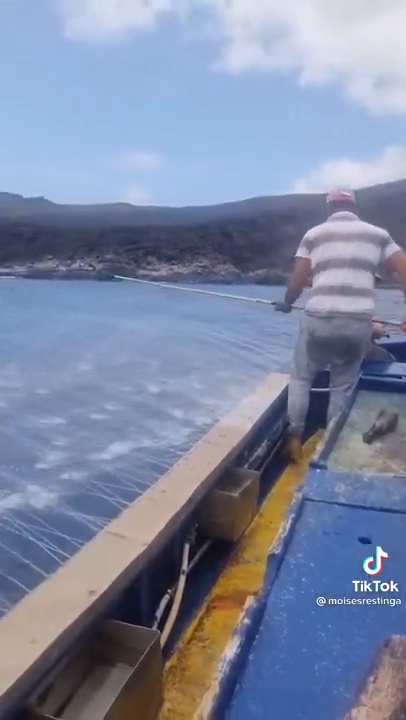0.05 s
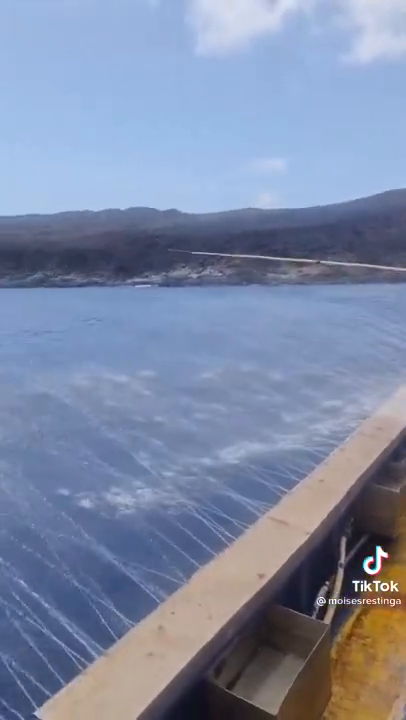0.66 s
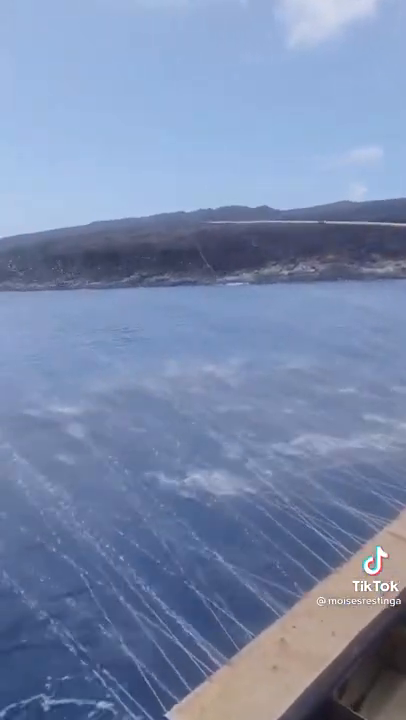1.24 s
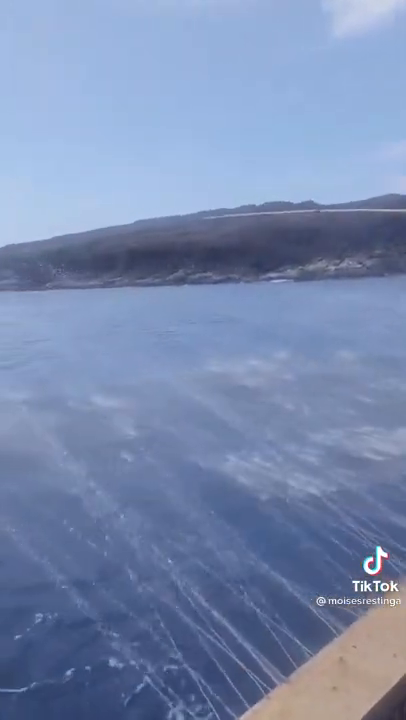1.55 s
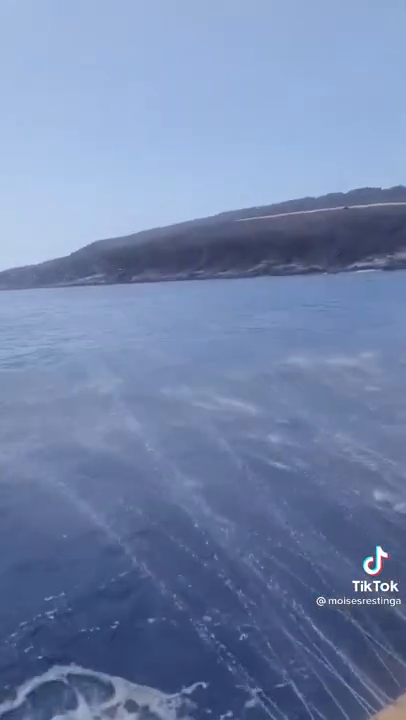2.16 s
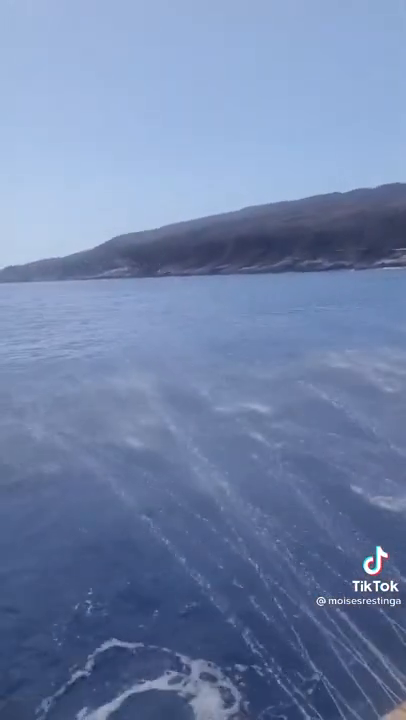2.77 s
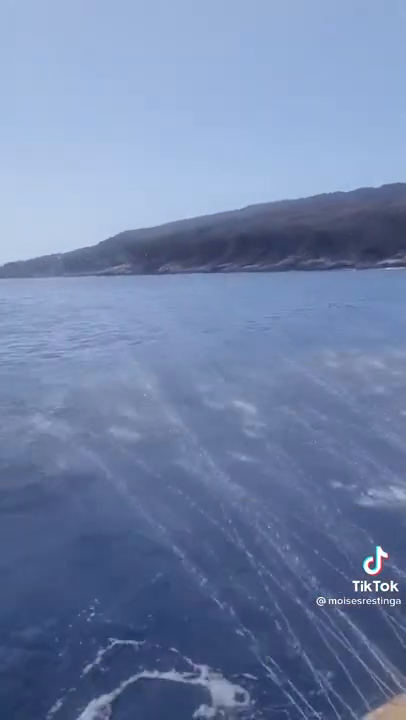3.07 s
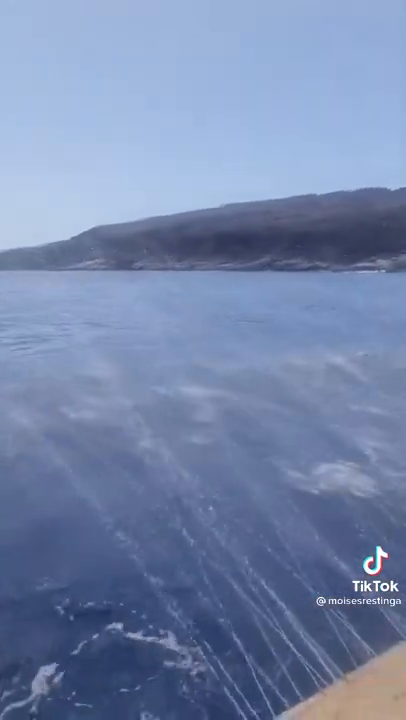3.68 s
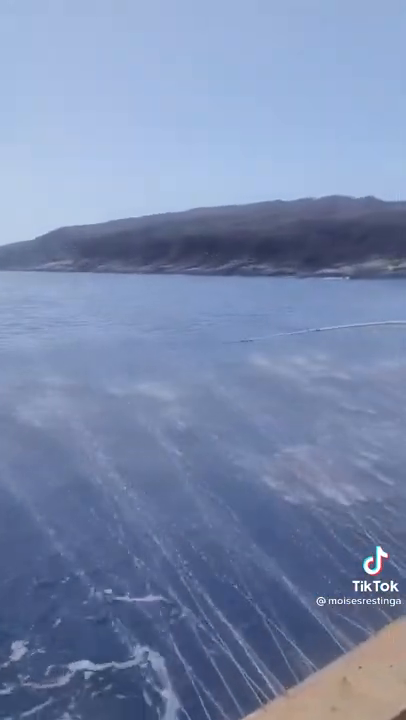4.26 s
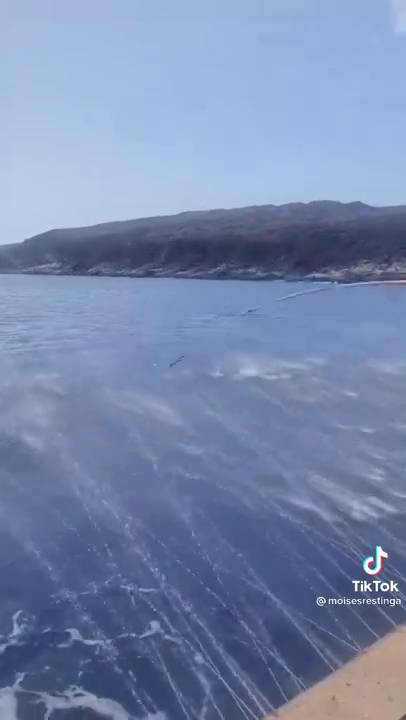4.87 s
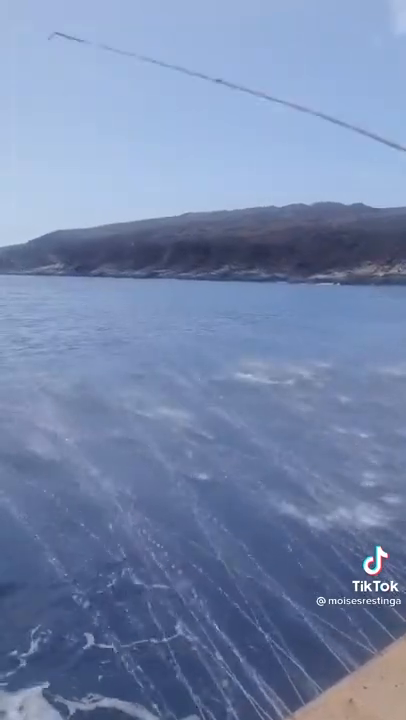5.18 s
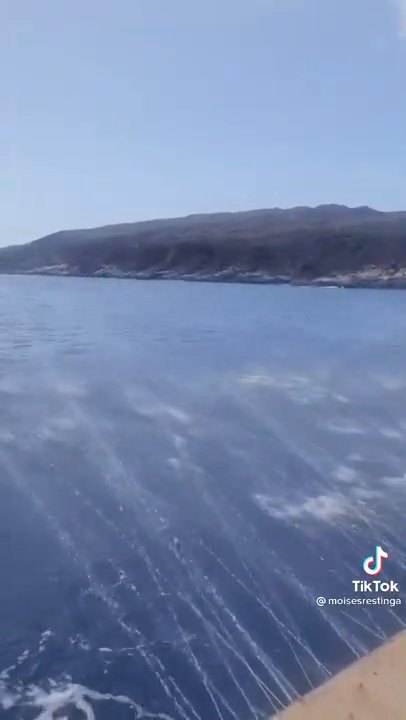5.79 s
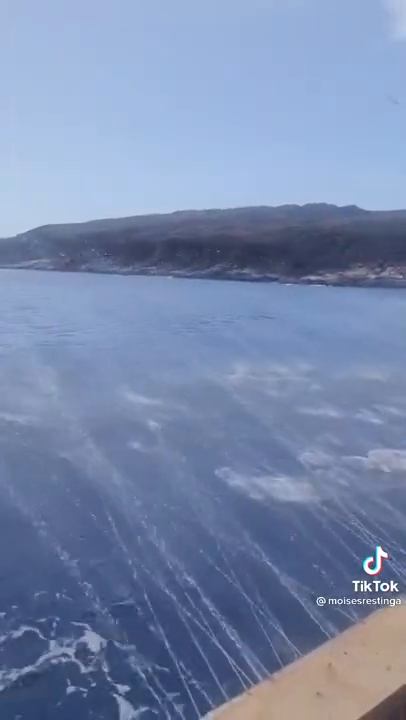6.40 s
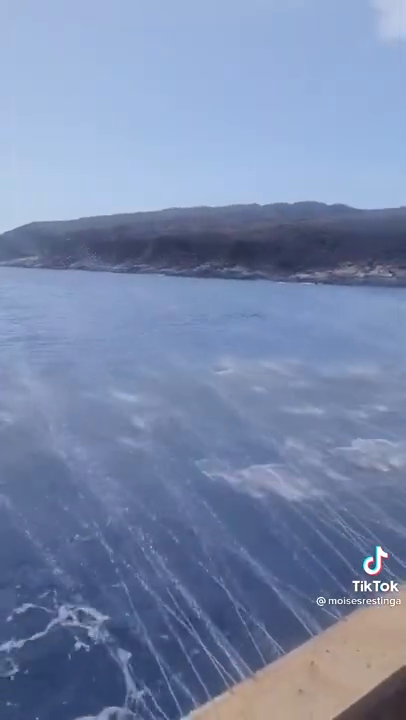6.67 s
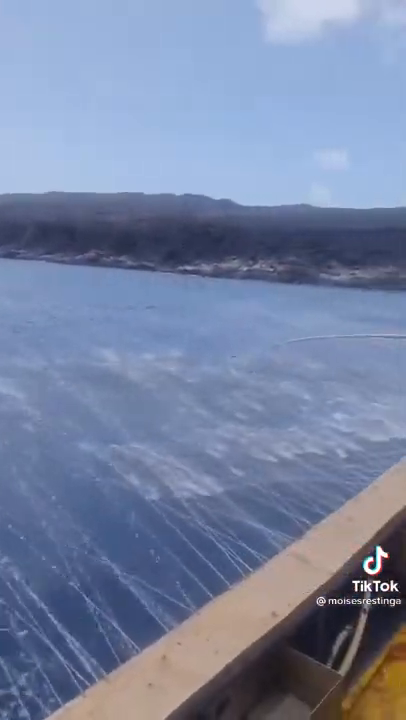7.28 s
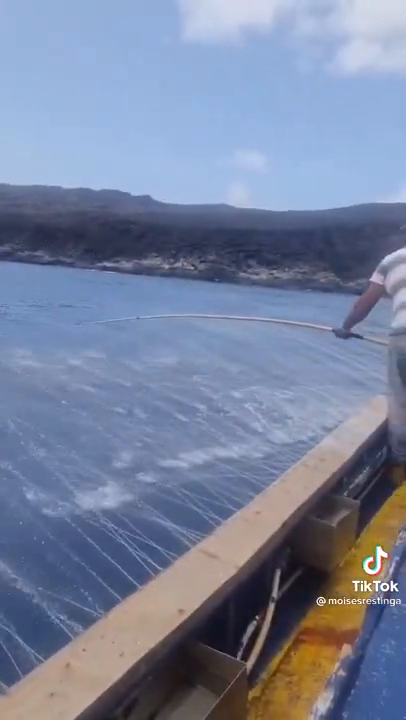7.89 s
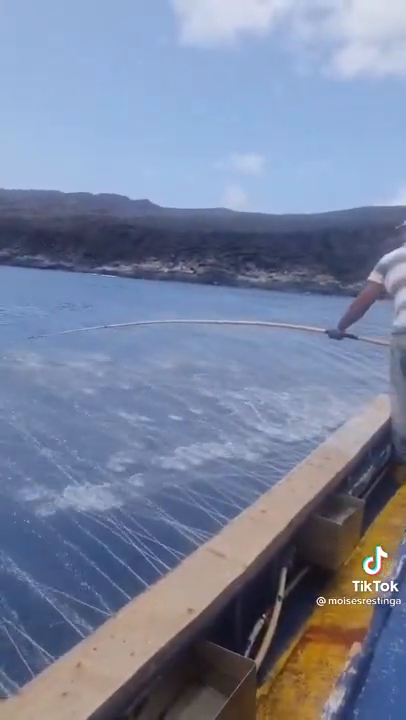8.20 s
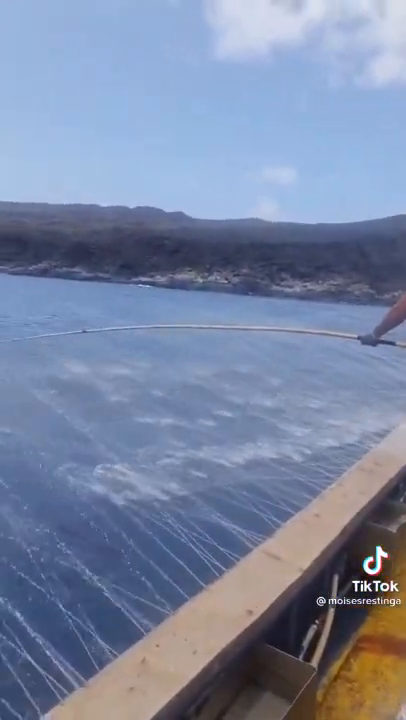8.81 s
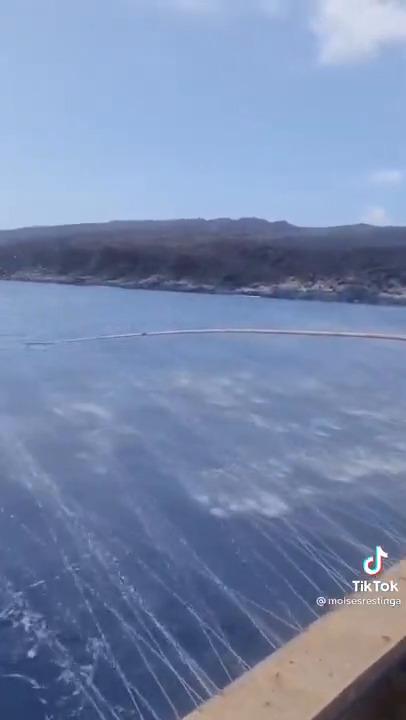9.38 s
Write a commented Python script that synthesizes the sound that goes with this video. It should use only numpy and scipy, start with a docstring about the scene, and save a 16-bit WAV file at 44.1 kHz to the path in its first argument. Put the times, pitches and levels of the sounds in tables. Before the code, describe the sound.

A steady, wide hiss of water jets splashing onto the sea runs over the low pulsing hum of a small boat's engines, heard from on deck. Early on, short wooden knocks and slaps of water come irregularly close by, and a few large drops tick. The knocks thin out in the middle, then come back as a louder cluster in the last two seconds while the spray and drone carry on.

```python
"""On the deck of a small fishing boat. From the start, main and pump engine drone 1.7 Hz apart,
so their hum throbs slowly; the swell sways both speeds, the pump surges and the planks rumble.
Throughout, a row of jets along the rail rains onto the sea in a fine hiss of drops and bubbles.
In the first 4 s, things thump on the wooden deck and water slaps down close by.
Single large drops tick between 1.5 and 7 s; from about 8 s the thumps come thicker and louder."""
import sys
import numpy as np
from scipy import signal
from scipy.fft import rfft, irfft, next_fast_len
from scipy.io import wavfile

SR = 44100
rng = np.random.default_rng(int(sys.argv[2]) if len(sys.argv) > 2 else 0)


def master(y):
    """Save y as 16-bit WAV."""
    cut = np.clip(np.atleast_2d(y).T, -1, 1)
    pcm = np.round(cut * 32767)  # scale
    wavfile.write(sys.argv[1], SR, pcm.astype(np.int16))


N = 425565
TIME = np.arange(N) / SR
SPRAY_LAG_S, BLOW_LAG_S = 0.000405, 0.00025  # left microphone port behind right


def undb(db):
    """Decibels to gain."""
    return 10 ** (np.asarray(db) / 20)


def unit(x):
    """Scale to rms 1."""
    return x / np.sqrt(np.mean(x ** 2))


def pan(db):
    """Gains of the two ports for a left minus right level."""
    return undb(np.array([[.5], [-.5]]) * db)


def curves(table):
    """Table columns, interpolated linearly in time."""
    time_s, *columns = np.transpose(table)
    return [np.interp(TIME, time_s, column) for column in columns]


def across(points, hz):
    """Read (Hz, value) points on a log-frequency axis."""
    points_hz, value = np.transpose(points)
    return np.interp(np.log(hz), np.log(points_hz), value)


def colour(x, spectrum, tilt_db_oct=0):
    """Filter by a tilted spectrum; rms 1."""
    size = next_fast_len(len(x) + SR // 20, True)
    hz = np.maximum(np.fft.rfftfreq(size, 1 / SR), 1)
    gain = undb(across(spectrum, hz) + tilt_db_oct * np.log2(np.maximum(hz, 100) / 1000))
    return unit(irfft(rfft(x, size) * gain, size)[:len(x)])


def walk(rate_hz):
    """Random drift through rate_hz new values a second."""
    return 1.77 * np.interp(TIME * rate_hz, np.arange(1024), rng.standard_normal(1024))


def ports(source, nearness=0, lag_s=SPRAY_LAG_S):
    """Wide source at two ports: a shared part, right first, plus each one's own; near ones share more."""
    shared = [(300, 0.55), (700, 0.17), (1400, 0.68), (2200, -0.13), (3500, -0.07), (7000, 0.08),
              (12000, 0.54)]  # part both ports hear alike: freq_hz, share
    balance = [(200, -4.5), (380, -4.5), (700, -3.5), (1300, -2), (2400, 1), (4400, -5), (6500, -4),
               (8500, -0.5), (12200, -7.5), (15000, -9.5)]  # left minus right: freq_hz, pan_db
    size = next_fast_len(N, True)
    hz = np.maximum(np.fft.rfftfreq(size, 1 / SR), 1)
    common, left, right = (rfft(source(), size) for _ in range(3))
    share = np.clip(across(shared, hz) + nearness, 0, 1)
    delay = np.exp(-2j * np.pi * hz * lag_s)
    pair = np.sqrt(share) * np.array([common * delay, common])
    pair += np.sqrt(1 - share) * np.array([left, right])
    return irfft(pair * pan(across(balance, hz)), size)[:, :N]


def firing_rates():
    """Main and pump rates in Hz: the swell loads and frees both; at first the main is picking up."""
    swell_period_s, least_load_s = 2.912, 1.409
    swell = np.cos(2 * np.pi * (TIME - least_load_s) / swell_period_s)
    shortfall_hz = .264 * np.exp(-TIME / .5)
    return 73.595 + .116 * swell - shortfall_hz, 71.916 + .224 * swell


def engine(firing_hz, firing_db, orders, firings_per_cycle, pan_db, overtone_db=0):
    """Firing tone plus overtones from unequal cylinders, each radiated by its own part of the boat."""
    in_step_s, left_lead_rad = 5.402, 0.23  # both engines fire together at in_step_s
    cycle_rad = 2 * np.pi * np.cumsum(firing_hz) / SR / firings_per_cycle
    cycle_rad -= np.interp(in_step_s, TIME, cycle_rad)
    firing = np.sin(firings_per_cycle * cycle_rad + left_lead_rad * np.array([[.5], [-.5]]))
    out = undb(firing_db + .35 * walk(24)) * firing * pan(pan_db)
    cycle_rad += 0.0065 * walk(4.6) + 0.0071 * walk(35)  # governor hunting, cycle jitter
    for order, level_db, order_pan_db in orders:
        gain = undb(level_db + overtone_db + 2.0 * walk(4))
        out += gain * np.sin(order * cycle_rad + rng.uniform(0, 2 * np.pi)) * pan(order_pan_db)
    return np.sqrt(2) * out


def main_engine(firing_hz, rumble_db):
    """Even drone; the planks radiate its overtones, which follow their rumble."""
    orders = [(4.997, -34, -3), (7, -53, -2), (9, -41, -2), (12, -43, 0), (14.97, -41, 0),
              (15.93, -55.5, -14), (20.92, -47, 2), (23.88, -46, -3), (26.87, -49.5, -5), (30, -57.5, -7),
              (33.1, -51.5, -11), (35.97, -56.5, -6), (38.8, -57.5, -6), (42, -62, -2), (44.92, -49, -2),
              (47.7, -61, -.5), (53.8, -57.5, -10)]  # overtones: cycle_multiple, level_db, pan_db
    return engine(firing_hz, firing_db=-20.5, orders=orders, firings_per_cycle=6, pan_db=-1.8,
                  overtone_db=1.6 * (rumble_db - rumble_db.mean()))


def pump_engine(firing_hz):
    """Slowly growing drone; it surges louder and faster, so strong and weak throbs alternate."""
    orders = [(6.1, -37.5, -7), (9.03, -39, -2), (10, -54, -2), (10.97, -40, -3), (14.16, -34.5, -2),
              (16.03, -46, -2), (18, -40.5, -5), (30, -46, -2), (33.04, -51.5, -9)]  # overtones: cycle_multiple, level_db, pan_db
    surge_db, surge_hz, period_s, crest_s = 1.9, .218, 1.165, 1.975
    surge = np.cos(2 * np.pi * (TIME - crest_s) / period_s)
    firing_db = -21.5 + 0.37 * TIME + surge_db * surge
    return engine(firing_hz + surge_hz * surge, firing_db, orders, firings_per_cycle=12, pan_db=-1.5)


def hull(firing_hz, level_db):
    """The planks rumble unevenly, shaken a little harder once every engine cycle."""
    spectrum = [(15, -16), (24, -15), (35, -1.5), (60, -1.5), (78, -6), (95, -.5), (130, -4.5), (180, -7.5),
                (230, -9), (295, -7.5), (345, -14.5), (390, -14.5), (460, -18), (700, -54)]  # rumble: freq_hz, density_db
    cycle_rad = 2 * np.pi * np.cumsum(firing_hz) / SR / 6
    shake = (1 + 0.081 * np.cos(cycle_rad)) * undb(1.23 * walk(12))
    mid, side = (colour(rng.standard_normal(N), spectrum) for _ in range(2))
    return undb(level_db) * shake * (mid + undb(-4.5) * side * np.array([[1], [-1]]))


def drops(rate_hz, spread_db, mist):
    """Drop impacts, a few much larger than the rest, over the even noise of mist."""
    hits = rng.random(N) < rate_hz / SR
    sizes = undb(spread_db * np.minimum(rng.exponential(size=N), 5))
    return unit(hits * sizes * rng.standard_normal(N)) + mist * rng.standard_normal(N)


def bubble(pitch_hz, decay_cycles):
    """Trapped air rings and rises in pitch."""
    cycles = np.arange(int(4 * decay_cycles * SR / pitch_hz)) * pitch_hz / SR
    envelope = (1 - np.exp(-cycles)) * np.exp(-cycles / decay_cycles)
    return envelope * np.sin(2 * np.pi * cycles * (1 + 0.0171 * cycles / decay_cycles))


def bubbles(count, low_hz, high_hz, decay_cycles, spread_db):
    """Bubbles of all sizes, a few much louder than the rest."""
    out = np.zeros(N + SR)
    for when, pitch, rank in rng.random((count, 3)):
        ring = bubble(low_hz * (high_hz / low_hz) ** pitch, decay_cycles)
        start = int(when * N)
        out[start:start + len(ring)] += undb(-spread_db * np.log(rank + 0.0064)) * ring
    return unit(out[:N])


def splashing():
    """The jets land on the sea: coarse drops and bubbles in uneven spurts."""
    spectrum = [(200, -13.5), (440, -2), (550, 0.5), (700, -3), (840, 1), (930, -1.5), (1020, 0), (1270, 1),
                (1550, -3.5), (1770, -2.5), (1950, -6.5), (2250, -5.5), (3150, -11.5), (3520, -9.5),
                (4200, -13), (4550, -16.5), (7000, -40), (12000, -56)]  # splash: freq_hz, density_db
    patter = colour(drops(rate_hz=1800, spread_db=1.5, mist=1.0), spectrum)
    rings = bubbles(count=3500, low_hz=450.2, high_hz=4988, decay_cycles=15.4, spread_db=2.5)
    fizz = colour(rings, spectrum, tilt_db_oct=4.5)
    return (patter + undb(-4) * fizz) * undb(0.75 * walk(22))


def hiss():
    """The nozzles and the finest droplets."""
    spectrum = [(1000, -13), (3000, 7), (4200, 1.5), (5700, 3.5), (7200, -1), (8700, -6.5), (10500, -2.5),
                (11400, 2.5), (12200, 1.5), (13200, -0.5), (14300, -5.5), (15500, -7.5)]  # fine spray: freq_hz, density_db
    flicker = undb(.7 * walk(20))
    return colour(drops(rate_hz=6000, spread_db=3.0, mist=1.7), spectrum) * flicker


def contact(length_s, tail_s, punch):
    """Rough contact noise and its rms: hard impact, hold, decay."""
    age_s = TIME[:SR // 4]
    attack = 1 - np.exp(-age_s / (0.021 * length_s))
    decay = np.exp(-np.maximum(age_s - length_s, 0) / tail_s)
    envelope = attack * decay * (1 + punch * np.exp(-age_s / 0.0041))
    return envelope * rng.standard_normal(len(age_s)), np.sqrt(np.mean(envelope ** 2))


def blows(events, spectrum, tail_s, focus_db_oct, grit, tilt_db_oct, dulling, punch):
    """Wet blows, duller when harder; the struck spot decides which board modes ring most."""
    deck = [(174.6, 0.16, 4), (289.5, 0.17, -2), (378, 0.083, -3), (486, 0.08, -7.5), (550, 0.14, -10),
            (690, 0.091, -9), (840, 0.072, 1.5), (1009, 0.056, 2), (1730, 0.056, 5.5), (2090, 0.066, -1),
            (2970, .02, 8)]  # board modes: pitch_hz, t60_s, level_db
    mode_hz, t60_s, mode_db = np.transpose(deck)
    out, age_s = np.zeros(N + SR), TIME[:SR // 4]
    decays = np.exp(-np.log(1000) * age_s / t60_s[:, None])
    modes = decays * np.sin(2 * np.pi * mode_hz[:, None] * age_s)
    signs = (-1) ** np.arange(len(mode_hz))  # neighbouring modes in antiphase
    median_db = np.median([row[1] for row in events])
    for start_s, level_db, contact_s, spot_hz, ring_db, bright_db_oct in events:
        push, push_rms = contact(contact_s, tail_s, punch)
        struck = (signs * undb(mode_db - focus_db_oct * np.abs(np.log2(mode_hz / spot_hz)))) @ modes
        shaken = signal.fftconvolve(push, struck)[:len(age_s)]
        ring = unit(unit(struck) + grit * unit(shaken))
        thud = colour(push, spectrum, tilt_db_oct + bright_db_oct - dulling * (level_db - median_db))
        start = int(start_s * SR)
        out[start:start + len(age_s)] += undb(level_db) * push_rms * (thud + undb(ring_db) * ring)
    return out[:N]


def thumps():
    """Something strikes the wooden deck and rings a narrow group of board modes."""
    events = [(.110, -29, 0.026, 1060, -19, 2.5), (.175, -32.5, .012, 2150, 0, -2),
              (.181, -34.5, .014, 494, 5, 1), (.272, -30, 0.0088, 300, 0, -1.5),
              (.287, -30, .008, 862, -5, 1), (.552, -37, .008, 845, -0.5, -5),
              (1.02, -30.5, 0.009, 298, -2, 0), (1.864, -34, .016, 850, -2, -2),
              (2.277, -28, 0.012, 378, -8, 0), (2.366, -35, 0.0092, 378, 2, -1),
              (2.454, -34, 0.012, 378, -1, 1.5), (2.974, -27.5, .012, 298, -9, 0),
              (3.451, -28.5, 0.012, 378, -13, 1), (3.618, -29, 0.025, 1080, -8, 1.5),
              (3.742, -26.5, 0.005, 550, -5, -.5), (4.015, -27.5, 0.01, 298, -15, -1),
              (5.69, -39, 0.01, 850, 2, 0), (7.906, -28, 0.023, 850, -12, 0),
              (7.997, -32.5, 0.0088, 850, -3, 1), (8.053, -24.5, 0.011, 180, -2.5, 1.5),
              (8.066, -25, .011, 850, -9, 0), (8.236, -19, 0.004, 550, -9, 0.1),
              (8.251, -22, 0.0036, 298, -5.5, -2), (8.460, -19.5, 0.019, 373, -7.5, 0),
              (8.648, -27.5, 0.009, 1000, -1, 0), (8.744, -23.5, 0.01, 380, -6.5, 0.5),
              (8.965, -36.5, .012, 450, 2, -8), (9.342, -27.5, 0.01, 1730, -8, -7),
              (9.347, -30.5, .005, 546, -1.5, -7), (9.354, -22.5, 0.0046, 222, -2, -6)]  # blows: start_s, level_db, contact_s, spot_hz, ring_db, bright_db_oct
    spectrum = [(80, -28), (170, 6.5), (300, 7), (400, 7), (540, 1.5), (680, 4.5), (900, 5.5), (1150, -1.5),
                (1500, -0.5), (1800, -5.5), (2300, -14.5), (3500, -17.5), (7000, -34), (15000, -35)]  # thud: freq_hz, density_db
    return blows(events, spectrum, tail_s=0.015, focus_db_oct=29.0, grit=0.9,
                 tilt_db_oct=1.6, dulling=0.11, punch=0.66)


def slaps():
    """Water slaps the deck and rings a wider group of board modes."""
    events = [(.437, -30.5, 0.014, 1900, -6, -0.5), (.631, -30, 0.01, 240, 4.5, 0.5),
              (.637, -30, .008, 3050, -3, 1.2), (1.205, -31.5, .007, 550, -6, -0.5),
              (3.166, -20.5, 0.012, 550, -9.5, 0.4), (3.936, -29.5, .009, 298, -8, 0),
              (9.176, -31.5, .012, 298, -20, 0)]  # blows: start_s, level_db, contact_s, spot_hz, ring_db, bright_db_oct
    spectrum = [(100, -10), (300, 22.5), (440, 15.5), (540, 14), (700, 7), (1500, 11), (2200, 2), (3300, 1),
                (5500, -5.5), (7200, -9.5), (8500, -19), (12000, -15), (16000, -28)]  # water impact: freq_hz, density_db
    return blows(events, spectrum, tail_s=0.016, focus_db_oct=11.0, grit=0.92,
                 tilt_db_oct=3.0, dulling=0.18, punch=0.35)


def drips():
    """Large drops land close by; each rings for milliseconds over a little spatter."""
    events = [(1.481, 2000, -30, .003), (2.085, 3750, -25, .0025), (2.091, 3500, -29, .002),
              (2.109, 1800, -30, .003), (3.028, 1700, -26, .004), (4.636, 2000, -29, .003),
              (6.409, 4300, -33, .004), (6.681, 4300, -28, .009), (7.099, 3200, -30, .003)]  # near drops: start_s, pitch_hz, level_db, decay_s
    out, age_s = np.zeros(N + SR), TIME[:SR // 10]
    for start_s, pitch_hz, level_db, decay_s in events:
        band = [(pitch_hz * .5, -30), (pitch_hz, 0), (pitch_hz * 2, -30)]
        spatter = colour(rng.standard_normal(len(age_s)), band) * np.exp(-age_s / decay_s)
        plink = bubble(pitch_hz, decay_s * pitch_hz)
        start = int(start_s * SR)
        out[start:start + len(plink)] += undb(level_db) * plink
        out[start:start + len(age_s)] += undb(level_db - 12) * spatter
    return out[:N]


def scene():
    """Engines under the deck, spray to the side, blows and drips nearby."""
    levels = [(0.0, -31.5, -33, -46.5), (1.24, -32.5, -35, -47), (1.72, -32.5, -34.5, -45.5),
              (2.42, -34, -33, -46.5), (3.44, -33, -35, -47.5), (3.71, -31.5, -33.5, -47),
              (4.45, -33.5, -34, -45.5), (4.68, -34, -33, -45.5), (5.05, -33.5, -34.5, -45.5),
              (6.23, -31.5, -34.5, -47), (7.05, -32, -35, -46.3), (7.5, -34.5, -34, -45),
              (7.95, -33, -34.5, -45), (8.5, -33, -34, -45), (9.0, -31, -34, -46), (9.22, -32.5, -35, -46),
              (9.65, -31.5, -33.5, -47)]  # background: time_s, rumble_db, splash_db, hiss_db
    hum = [(0, 0.5), (.5, -1), (1.15, 0), (1.9, 0.3), (3.0, 0), (4.2, -0.5), (5.4, 0.5), (6.0, -1.5),
           (6.55, -1), (7.2, 0.7), (7.85, 0.5), (9.0, -0.5), (9.65, -1)]  # engine hum at the microphone: time_s, gain_db
    rumble_db, splash_db, hiss_db = curves(levels)
    hum_db, = curves(hum)
    main_hz, pump_hz = firing_rates()
    engines = (main_engine(main_hz, rumble_db) + pump_engine(pump_hz)) * undb(hum_db)
    planks = hull(main_hz, rumble_db - 0.2) * pan(-4)
    spray = ports(splashing) * undb(splash_db + 1.5) + ports(hiss) * undb(hiss_db + 6.5)
    knocks = ports(thumps, nearness=0.22, lag_s=BLOW_LAG_S) * undb(0.34)
    water = ports(slaps, nearness=0.09, lag_s=BLOW_LAG_S) * undb(1.0)
    return engines + planks + spray + knocks + water + drips() * pan(-4)


def record(dry):
    """The phone cuts the top."""
    cutoff_hz = 15600
    return signal.sosfilt(signal.ellip(10, .2, 80, cutoff_hz, fs=SR, output="sos"), dry)


dry = scene()
out = record(dry)
master(out)
```